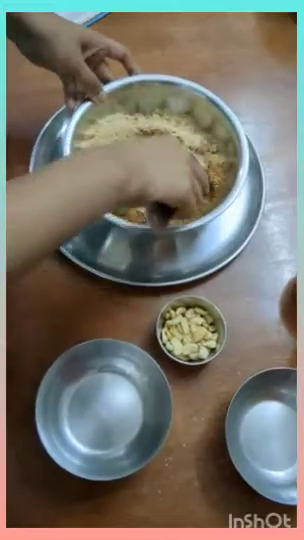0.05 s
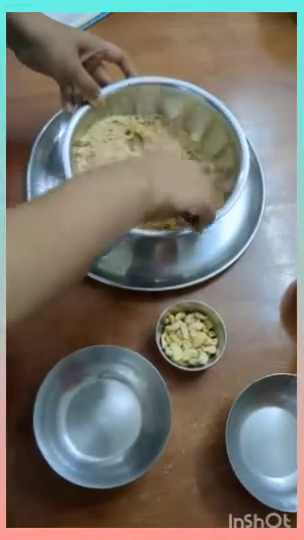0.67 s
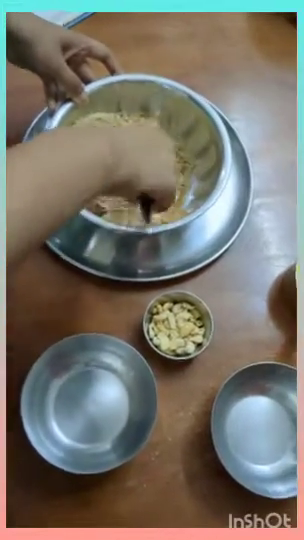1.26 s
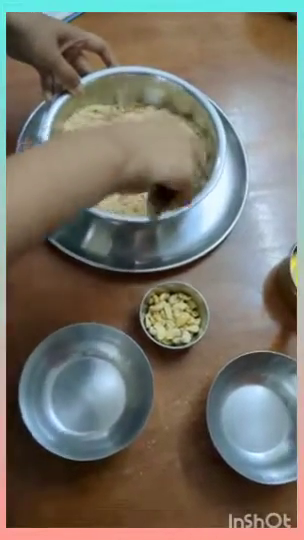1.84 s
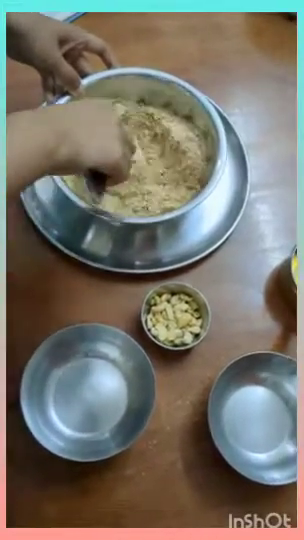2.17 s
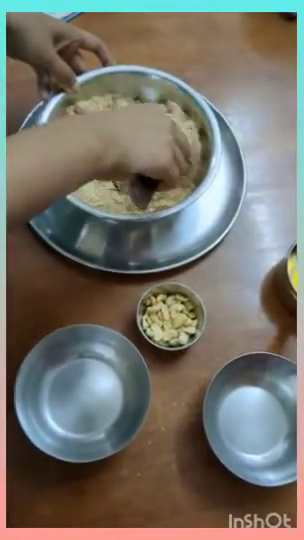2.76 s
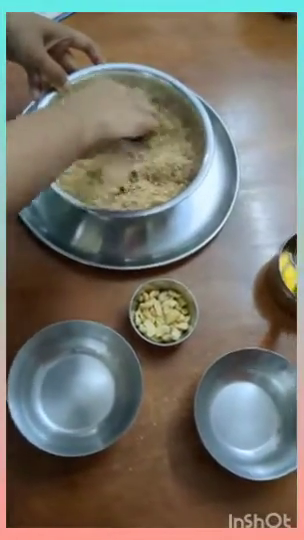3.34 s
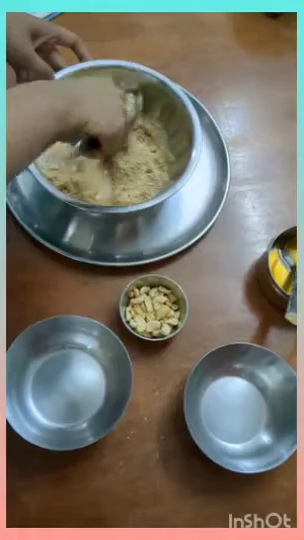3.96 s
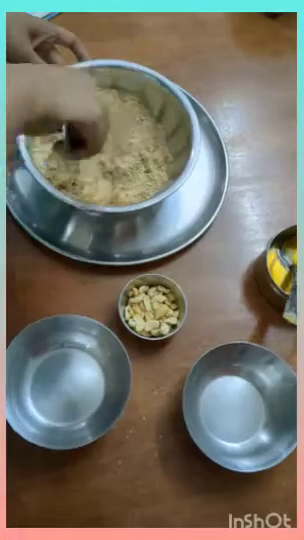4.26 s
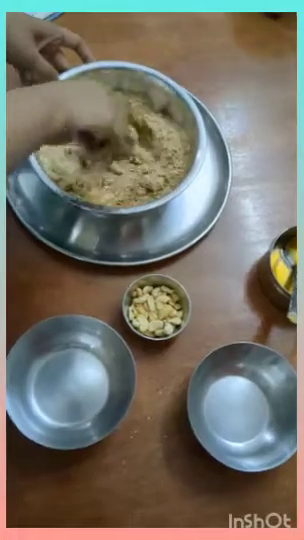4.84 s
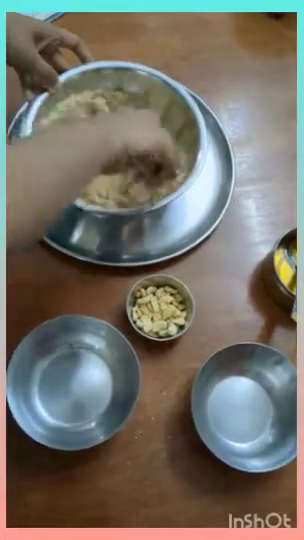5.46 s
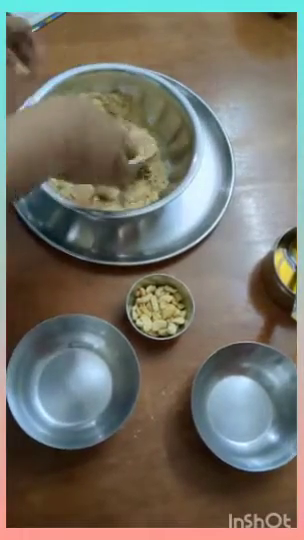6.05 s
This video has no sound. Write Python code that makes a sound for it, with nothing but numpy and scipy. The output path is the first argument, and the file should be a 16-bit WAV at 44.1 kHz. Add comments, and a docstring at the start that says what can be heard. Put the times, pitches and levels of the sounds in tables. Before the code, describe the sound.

A steel spoon stirs dry flour in a steel bowl close by, with soft hissing strokes and gritty scrapes throughout. Sharp, briefly ringing clinks come at about 0.1, 0.5 and 0.9 seconds. From 1.5 to 2 seconds several knocks follow, with dull thuds as the bowl rocks on a steel plate and wooden table. Another clear clank lands at 2.6 seconds, then lighter taps and a short low rub around 3 seconds. A quick cluster of knocks comes near 3.5 seconds. From about 4 to 5.3 seconds there is only quiet stirring, with a second low rub near 4.9. A fast flurry of clanks and thuds runs from 5.3 to 5.6 seconds, followed by a last soft stroke. A low rustle lingers after the knocks, the kitchen adds a short echo, and an appliance hums faintly all along.

```python
"""A bare kitchen: a steel spoon stirs flour in a steel bowl, on a steel plate on a wooden table.
Flour hisses under each stroke and grit scrapes the steel. The spoon knocks on the wall; the bowl rocks
and thuds into the table. A low-mid rustle lingers after each knock, and there are two short low rubs.
All of it rings through the modes of bowl, plate and table and echoes in the room.
An appliance hums faintly nearby."""
import sys
import numpy as np
from scipy import signal
from scipy.fft import rfft, irfft, next_fast_len
from scipy.io import wavfile
from scipy.ndimage import uniform_filter1d

SR = 44100
rng = np.random.default_rng(int(sys.argv[2]) if len(sys.argv) > 2 else 0)


def materialize(psi):
    """Save the field psi as 16-bit PCM at rate SR to the path in sys.argv[1].

    A 1-D psi becomes a single channel; in a 2-D psi each row is a channel.
    """
    bounded = np.clip(np.atleast_2d(psi).T, -1, 1)
    quanta = np.round(bounded * 32767).astype(np.int16)
    wavfile.write(sys.argv[1], SR, quanta)


N = 273861
TIME = np.arange(N) / SR


def from_db(db):
    """Decibels to gain."""
    return 10 ** (np.asarray(db) / 20)


def unit_rms(x):
    """Scale to rms 1."""
    return x / np.sqrt(np.mean(x ** 2) + 1e-20)


def at_hz(curve, hz):
    """Interpolate over log frequency."""
    freq_hz, value = np.transpose(curve)
    return np.interp(np.log(np.maximum(hz, 1)), np.log(freq_hz), value)


def band(x, low_hz, high_hz):
    """Causal Butterworth band-pass."""
    return signal.sosfilt(signal.butter(3, [low_hz, high_hz], "band", fs=SR, output="sos"), x)


def colour(x, spectrum):
    """Zero-phase EQ."""
    size = next_fast_len(N)
    gain = from_db(at_hz(spectrum, np.fft.rfftfreq(size, 1 / SR)))
    return irfft(rfft(x, size) * gain, size)[..., :N]


def resonance(x, hz, width_hz):
    """Two-pole resonator, unity peak gain."""
    r = np.exp(-np.pi * width_hz / SR)
    feedback = [1, -2 * r * np.cos(2 * np.pi * hz / SR), r * r]
    return signal.lfilter(np.array([1, 0, -1]) * (1 - r * r) / 2, feedback, x + 1e-18)


def stereo(pair, correlation):
    """Two independent noises to correlated left and right."""
    mid = np.sqrt(1 + correlation) * pair[0]
    side = np.sqrt(1 - correlation) * pair[1]
    return np.array([mid + side, mid - side]) / np.sqrt(2)


def pan(left_db):
    """Left and right gains for a level difference."""
    return from_db(np.array([[left_db], [-left_db]]) / 2)


# room field, left to right: freq_hz, correlation
ROOM_CORRELATION = [(60, 0.95), (140, 1), (290, 0.95), (640, 0.29), (1400, 0), (15000, 0.036)]
# pitch_hz, width_hz, level_db
HUM_TONES = [(56.7, 8.5, -68), (73, 40, -62.5), (129, 12, -64.5), (178, 27, -76.5)]


def appliance_hum():
    """Low wavering tones of narrow-band noise."""
    hum = 0
    for hz, width_hz, level_db in HUM_TONES:
        noise = rng.standard_normal((2, N + SR))
        tone = resonance(resonance(noise, hz, width_hz), hz, width_hz)[:, SR:]
        hum += from_db(level_db) * unit_rms(stereo(tone, at_hz(ROOM_CORRELATION, hz)))
    return hum


# freq_hz, gain_db
AIR_SPECTRUM = [(120, -33.5), (200, 3), (424, -8.5), (1060, -14), (2860, -9.5), (3900, -18.5), (15100, -32),
                (16000, -42.5)]


def room_air(level_db=-77):
    """Faint steady room noise."""
    noise = stereo(rng.standard_normal((2, N)), correlation=0.25)
    return from_db(level_db) * unit_rms(colour(noise, AIR_SPECTRUM))


def friction(slips_per_s, size_spread_db, hiss_db, clump_db=5, clump_s=0.012):
    """Tiny uneven slips over a sliding hiss, bunched as lumps of flour give way; rms 1."""
    sizes = from_db(size_spread_db * np.minimum(rng.exponential(1, N), 4)) * rng.standard_normal((2, N))
    slips = unit_rms(stereo(sizes, correlation=1) * (rng.random(N) < slips_per_s / SR))
    lumps = unit_rms(uniform_filter1d(rng.standard_normal(N), round(clump_s * SR)))
    hiss = from_db(hiss_db) * rng.standard_normal((2, N))
    return unit_rms((slips + hiss) * from_db(clump_db * lumps))


# freq_hz, gain_db
FLOUR_SPECTRUM = [(2000, -19.5), (4000, -5), (6000, 3), (8000, 1), (10000, 0.5), (12500, 5.5), (16000, -1)]
SCRAPE_SPECTRUM = [(600, -16.5), (1100, -3.5), (1700, 5), (3000, -0.5), (4200, -6), (7000, -16)]
# start_s, length_s, flour_db, scrape_db
SPOON_STROKES = [(0, 0.15, -55.5, -70), (0.177, 0.017, -33, -60), (0.592, 0.21, -48, -53.5),
                 (0.935, 0.17, -53, -45), (1.438, 0.12, -56.5, -61), (1.486, .12, -41.5, -46.5),
                 (1.58, 0.058, -32.5, -49.5), (1.848, 0.034, -48.5, -43), (2.35, 0.35, -60.5, -71.5),
                 (2.6, 0.095, -50, -50), (2.738, 0.42, -54.5, -61.5), (2.89, 0.094, -49, -46.5),
                 (3.334, 0.23, -55.5, -62), (3.708, 0.18, -51, -61.5), (4.026, 0.056, -62.5, -75.5),
                 (4.34, 0.24, -58, -60), (4.59, 0.11, -57.5, -62), (4.77, 0.21, -65, -65),
                 (5.315, 0.27, -54, -48), (5.772, 0.25, -55.5, -57)]


def stirring(trim_db=-1, fastest_share=0.73):
    """Flour shears and hisses, grit scrapes the steel; both follow spoon speed."""
    scrape_gain, flour_gain = np.zeros((2, N))
    for start_s, length_s, flour_db, scrape_db in SPOON_STROKES:
        ramp = np.interp(TIME, start_s + length_s * np.array([0, fastest_share, 1]), [0, 1, 0])
        speed = np.sin(np.pi / 2 * ramp)
        scrape_gain += from_db(scrape_db + trim_db) * speed
        flour_gain += from_db(flour_db + trim_db) * speed
    flour = colour(friction(slips_per_s=7700, size_spread_db=2, hiss_db=8), FLOUR_SPECTRUM)
    scrape = colour(friction(slips_per_s=1100, size_spread_db=-1, hiss_db=-0.5), SCRAPE_SPECTRUM)
    return flour_gain * unit_rms(flour) + scrape_gain * unit_rms(scrape)


# freq_hz, gain_db
RUSTLE_SPECTRUM = [(150, -16), (280, 1.5), (500, -1.5), (1000, -8.5), (2000, -26.5)]
# two short rubs, then the tail of the last flurry: start_s, level_db, decay_s
RUSTLE_SWELLS = [(2.92, -56.5, 0.19), (4.92, -51, 0.056), (5.9, -66.5, 0.58)]


def low_rustle(floor_db=-76, rise_s=0.03, tail_db=-27.5, tail_s=0.33):
    """Low-mid rustle fading slowly after each knock and the last flurry, plus two short low rubs."""
    tails = [(start_s, rock_db + tail_db, tail_s) for start_s, *_, rock_db, _ in SPOON_KNOCKS]
    power = np.full(N, from_db(floor_db) ** 2)
    for start_s, level_db, decay_s in list(RUSTLE_SWELLS) + tails:
        start = round(start_s * SR)
        t = TIME[:N - start]
        power[start:] += (from_db(level_db) * np.minimum(t / rise_s, 1) * np.exp(-t / decay_s)) ** 2
    rustle = stereo(friction(slips_per_s=120, size_spread_db=2, hiss_db=-1), correlation=0.55)
    return np.sqrt(power) * unit_rms(colour(rustle, RUSTLE_SPECTRUM))


def dense_modes(samples, even_hz):
    """Closely packed modes: two noises with even power over each span of even_hz."""
    spectrum = rfft(rng.standard_normal((2, samples)))
    power = uniform_filter1d(np.abs(spectrum) ** 2, max(3, round(even_hz * samples / SR)), axis=1)
    return unit_rms(irfft(spectrum / np.sqrt(power), samples))


def struck_band(low_hz, high_hz, t60_s, energy_s=0.013, crack_db=9, crack_s=0.0008, rise_s=0.00088):
    """A blow on a band of modes: bare pulse, and stereo wash led by a crack."""
    t = TIME[:SR // 5]
    pulse = band(signal.unit_impulse(len(t)), low_hz, high_hz)
    decay = from_db(-60 * t / t60_s) + from_db(crack_db) * np.exp(-t / crack_s)
    attack = 1 - np.exp(-t / rise_s)
    modes = stereo(dense_modes(len(t), even_hz=50), max(0.1, at_hz(ROOM_CORRELATION, low_hz)))
    wash = band(attack * decay * modes, low_hz, high_hz)
    return [unit_rms(part) * np.sqrt(energy_s / t[-1]) for part in (pulse, wash)]


def mode_pair(hz, t60_s=0.22, energy_s=0.0096, beat_hz=23):
    """Two close modes ring clear and beat."""
    t = TIME[:SR // 5]
    pair = np.sin(2 * np.pi * hz * t) + 0.5 * np.sin(2 * np.pi * (hz + beat_hz) * t)
    return unit_rms(pair * from_db(-60 * t / t60_s)) * np.sqrt(energy_s / t[-1])


BOWL_LEFT_DB = 2


def edge_tick(level_db, glint_db=-8, send_db=-3):
    """Each contact point wakes a few high steel modes of its own; returns direct, room send."""
    pulse, wash = struck_band(4300, 18000, t60_s=0.058)
    modes = sum(mode_pair(hz, t60_s=0.026) for hz in rng.uniform(4200, 12500, size=6))
    glint = from_db(glint_db) * modes / np.sqrt(6)
    gain = from_db(level_db)
    return gain * (wash + glint) * pan(BOWL_LEFT_DB), gain * from_db(send_db) * (pulse + glint)


def struck_part(drive_db, hz, band_ratio, t60_s, gain_db, send_db, tone_db):
    """Low parts bump, higher parts ring off-centre; returns direct, room send."""
    pulse, wash = struck_band(hz / band_ratio, hz * band_ratio, t60_s)
    tone = from_db(tone_db) * mode_pair(hz)
    body = pulse if hz < 290 else wash * pan(BOWL_LEFT_DB * min(hz / 2000, 1))
    gain = from_db(drive_db + gain_db)
    return gain * (body + tone / 2), gain * from_db(send_db) * (pulse + tone)


# rows thud, plate, bottom, clank, ring: band_ratio, t60_s, gain_db, send_db, tone_db
PART_RESPONSES = [(1.388, .12, 0, 4.5, -14), (1.6, .08, 1.5, -1, -4), (1.6, .07, -1, 2, -11.5),
                  (1.275, 0.041, -4, -3.5, -12), (1.22, 0.1, -6, -4.5, -6)]
# start_s, force_db, hardness_db, clank_hz, ring_hz, rock_db, thud_hz
SPOON_KNOCKS = [(0.147, -30, -1.5, 1635, 3820, -50, 216), (0.5296, -20.5, 3.5, 1790, 2530, -68.5, 129),
                (0.771, -41, -3, 1940, 3010, -74.5, 120), (0.817, -48, -0.5, 1900, 3000, -74, 128),
                (0.943, -25.5, 10, 1633, 3185, -35.5, 200.8), (1.548, -34, 1.5, 1800, 3660, -36.5, 179.3),
                (1.594, -37, 0.5, 1680, 3340, -40, 146.5), (1.84, -31, -4.5, 1746, 5420, -37, 189),
                (2.018, -31, -2, 1517, 2865, -42.5, 154), (2.048, -38.5, -0.5, 1710, 3040, -41, 158.5),
                (2.5932, -24, 1, 2420, 2850, -42.5, 111), (2.932, -39.5, 5, 2070, 2860, -70.5, 150),
                (2.981, -41, 8.5, 1450, 3090, -59.5, 127), (3.091, -40.5, -8, 1560, 2760, -58, 129),
                (3.489, -31, 4.5, 1830, 3380, -44.5, 260.5), (3.551, -33.5, 9.5, 1880, 3230, -42, 218.3),
                (3.587, -30, 4, 1670, 2970, -37, 216), (3.634, -28, -3.5, 1670, 3170, -37, 216),
                (3.796, -35, 1.5, 1566, 3287, -63.5, 148), (5.34, -36.5, 6.5, 1940, 3030, -46, 139.5),
                (5.391, -32, 0.5, 1690, 3200, -45, 214), (5.427, -27, -1, 1690, 3860, -42, 219),
                (5.471, -36, 4.5, 1610, 3000, -46.5, 226), (5.505, -34.5, 0, 1860, 3560, -41.5, 238),
                (5.541, -29.5, 7.5, 1720, 3070, -39, 208), (5.584, -33, 2.5, 1680, 3040, -39.5, 181),
                (5.622, -24.5, 2.5, 1760, 3503, -42.5, 212.6)]


def knocks(bounce_s=0.0093, bounce_db=-17, usual_thud_hz=204.5):
    """Force drives the bowl, hardness adds spoon ring and tick, rocking drives plate and table."""
    direct, send = np.zeros((2, 2, N + SR))

    def add(start_s, near, far, bounces):
        """Mix in one hit and, optionally, the spoon's single bounce."""
        for delay_s, db in [(0, 0), (bounce_s, bounce_db)] if bounces else [(0, 0)]:
            start = round((start_s + delay_s) * SR)
            direct[:, start:start + len(far)] += from_db(db) * near
            send[:, start:start + len(far)] += from_db(db) * far

    for start_s, force_db, hardness_db, clank_hz, ring_hz, rock_db, thud_hz in SPOON_KNOCKS:
        add(start_s, *edge_tick(force_db + hardness_db - 7.5), bounces=True)
        # a higher thud drives the plate harder and deeper
        thud_octaves = np.log2(thud_hz / usual_thud_hz)
        plate_db = rock_db + 2.5 + 9 * thud_octaves + 0.55 * hardness_db
        plate_hz = 445.5 * 2 ** (-0.9 * thud_octaves)
        parts = [(rock_db, thud_hz),
                 (plate_db, plate_hz),
                 (force_db - 20.5, 540),  # bowl bottom
                 (force_db, clank_hz),
                 (force_db + hardness_db - 5.5, ring_hz)]
        for (drive_db, hz), response in zip(parts, PART_RESPONSES):
            add(start_s, *struck_part(drive_db, hz, *response), bounces=hz >= clank_hz)
    return direct[:, :N], send[:, :N]


# bowl, plate and table: pitch_hz, width_hz, gain_db
BODY_MODES = [(132.7, 9, 8.5), (136, 6.4, -5), (193.8, 4.2, 3.5), (217.8, 30, 3), (256.4, 22, -1.5),
              (339.3, 45, 3.5), (374, 4.8, -1.5), (450.5, 7.6, -3.5), (553, 8.3, -8.5), (930, 160, -9.5),
              (1376, 4.8, 3), (1673, 27, -0.5), (1992, 29, 1), (2235, 43, -6), (2803, 120, 3.5),
              (3300, 8.3, 2), (3680, 3.9, 1.5), (4530, 89, -11), (6920, 250, -5), (8940, 380, -4),
              (9520, 370, -3)]
# dense upper steel modes: freq_hz, gain_db
STEEL_SPECTRUM = [(100, -2), (300, -10), (900, -5), (1150, -1), (1700, -3), (3000, -2.5), (4200, 1.5),
                  (5600, -4), (8000, -4.5), (10000, -4), (12500, -5), (14000, -6.5), (16000, -12.5)]


def bowl_body(x):
    """Steel passes contacts on and rings, damped by flour and the holding hand."""
    ringing = sum(from_db(db) * resonance(x, hz, width_hz) for hz, width_hz, db in BODY_MODES)
    return colour(x + ringing, STEEL_SPECTRUM)


# freq_hz, t60_s
KITCHEN_DECAY = [(100, 0.85), (260, 0.45), (700, 0.6), (1840, .6), (4850, 0.51), (12800, 0.39)]


def kitchen_echo(send, build_s=0.0069):
    """Diffuse echoes build up, then decay band by band."""
    t, response = TIME[:SR], 0
    build = 1 - np.exp(-(t / build_s) ** 2)
    edges_hz = np.geomspace(70, 18000, 15)
    for low_hz, high_hz in zip(edges_hz, edges_hz[1:]):
        hz = np.sqrt(low_hz * high_hz)
        echoes = np.hstack([dense_modes(SR // 10, even_hz=40) for _ in range(10)])
        noise = band(stereo(echoes, at_hz(ROOM_CORRELATION, hz)), low_hz, high_hz)
        tail = noise * build * from_db(-60 * t / at_hz(KITCHEN_DECAY, hz))
        response += unit_rms(tail) * np.sqrt(2 * (high_hz - low_hz)) / SR
    return signal.oaconvolve(send, response, axes=1)[:, :N]


def scene(stir_send_db=-1, right_lag_s=0.00018):
    """Knocks, strokes and rustle through bowl and room, left ear first, over hum and air."""
    knock_direct, knock_send = knocks()
    stir = stirring() + low_rustle()
    direct = knock_direct + stir
    direct[1] = np.interp(TIME - right_lag_s, TIME, direct[1])
    echo = kitchen_echo(knock_send + from_db(stir_send_db) * stir[0])
    return bowl_body(direct + echo) + appliance_hum() + room_air()


def record(dry, cutoff_hz=16100):
    """Steep elliptic low-pass."""
    return signal.sosfilt(signal.ellip(10, 0.2, 80, cutoff_hz, fs=SR, output="sos"), dry)


dry = scene()
out = record(dry)
materialize(out)
```